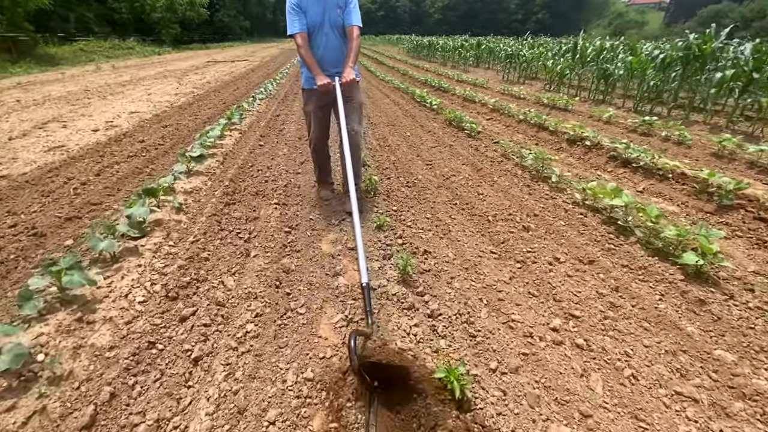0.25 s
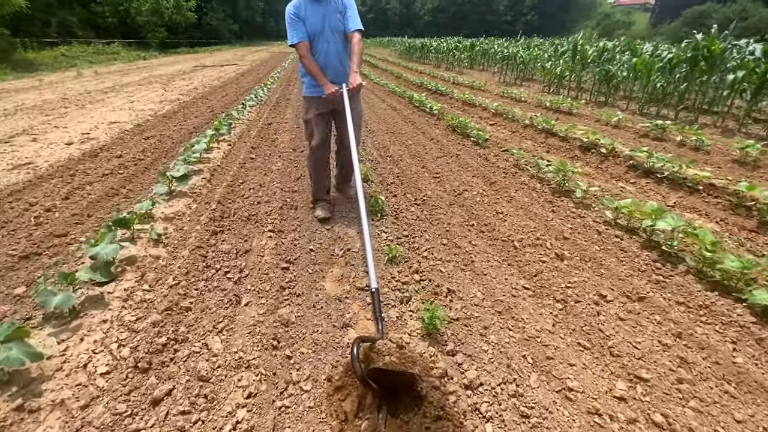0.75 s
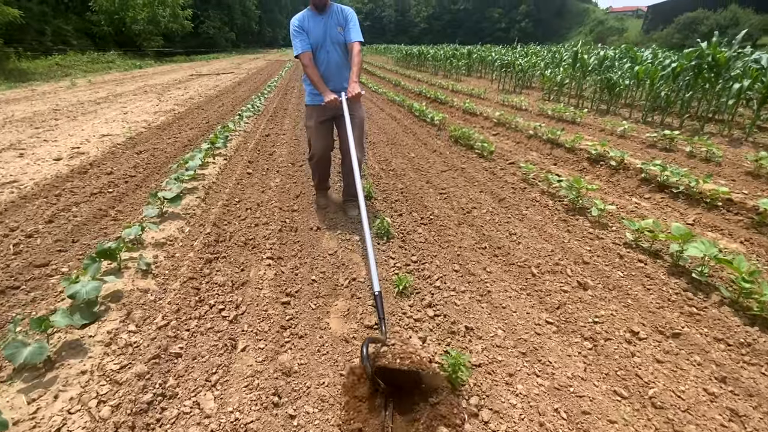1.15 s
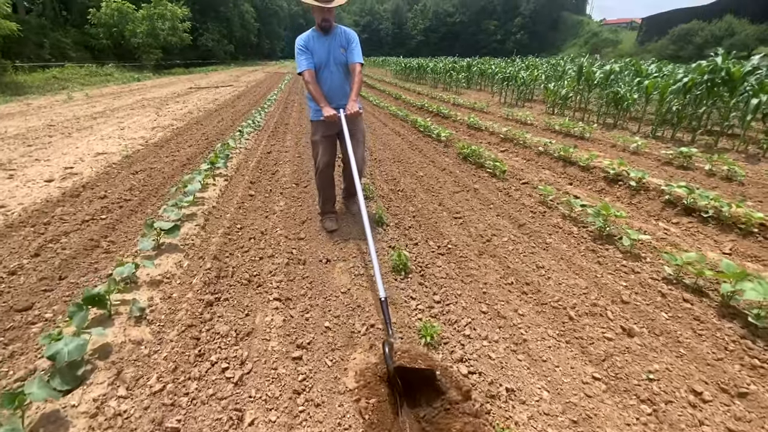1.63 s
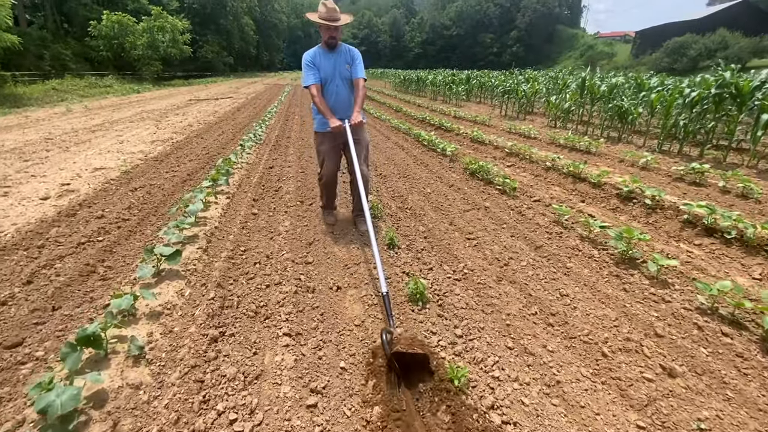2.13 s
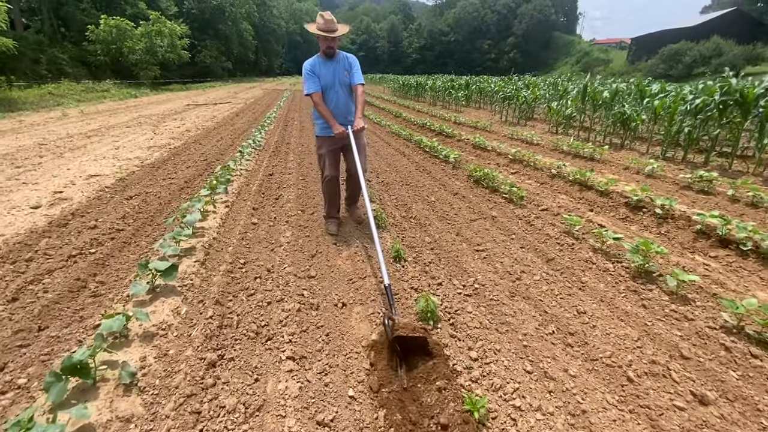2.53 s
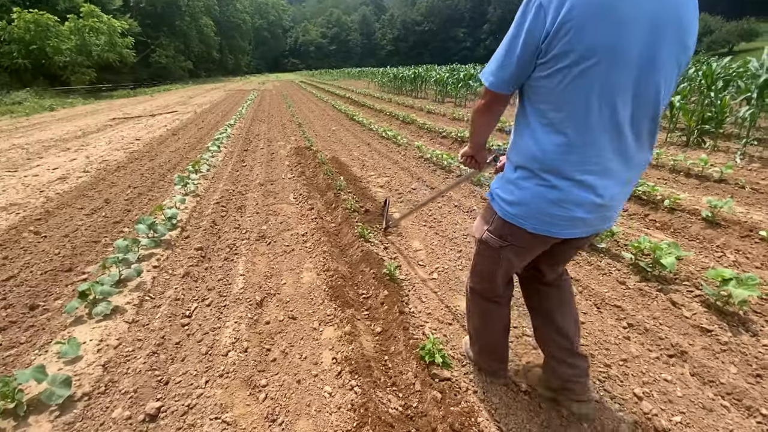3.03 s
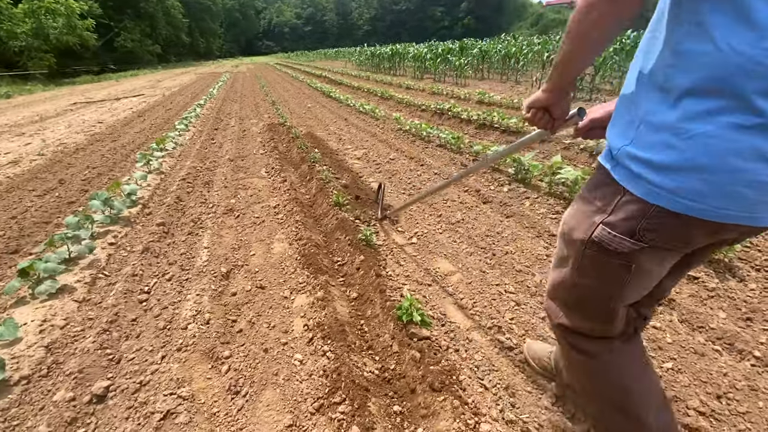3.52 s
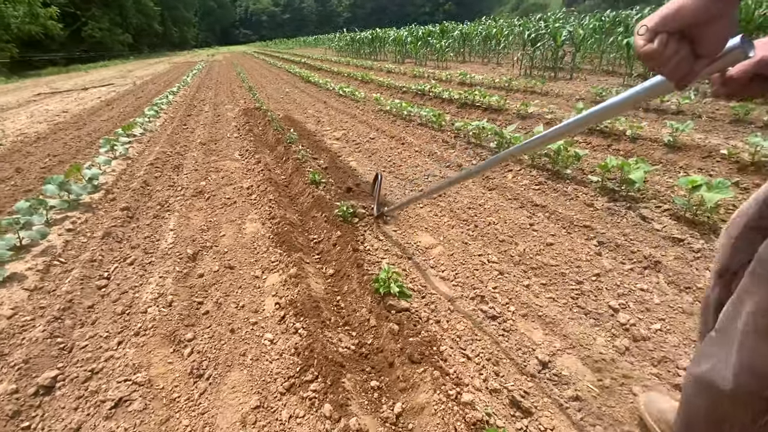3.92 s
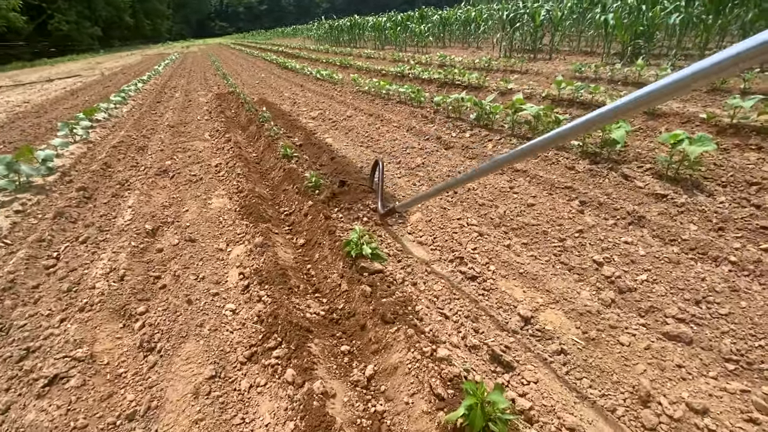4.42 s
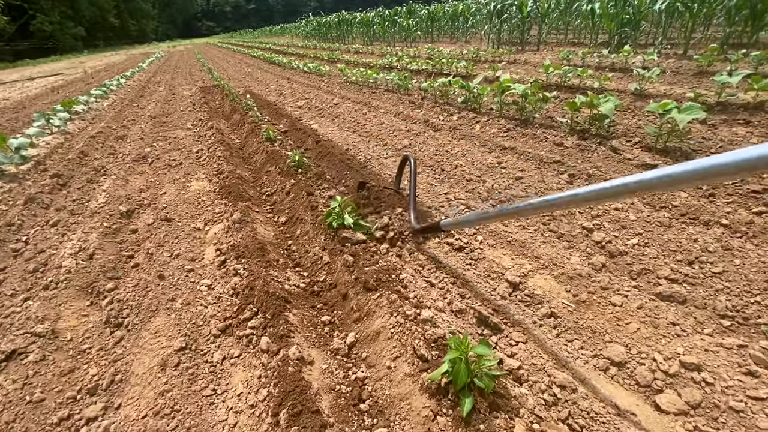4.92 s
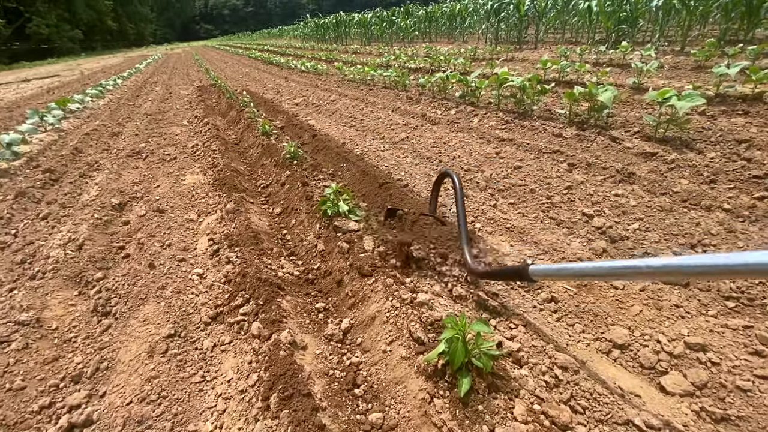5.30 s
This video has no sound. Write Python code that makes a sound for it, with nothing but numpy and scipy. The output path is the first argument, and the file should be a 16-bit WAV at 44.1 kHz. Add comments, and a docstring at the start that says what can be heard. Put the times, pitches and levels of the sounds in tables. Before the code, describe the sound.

A small hand plow scrapes and crunches through dry soil, with stones ticking on steel, dull thuds of clods and boots, and light wind.

```python
"""Hand plow in dry soil

A steel plow is dragged through cloddy soil, heard by a phone from two places one after the other.
Grit hisses and crackles along the blade and rings it; stones strike it, soil rumbles and crunches,
clods and boots thud. Wind buffets the microphone ports, leaves rustle, an insect and a bird call far off."""
import sys
import numpy as np
from scipy import signal
from scipy.fft import rfft, irfft, next_fast_len
from scipy.io import wavfile
from scipy.ndimage import uniform_filter1d, map_coordinates

SR = 44100
rng = np.random.default_rng(int(sys.argv[2]) if len(sys.argv) > 2 else 0)


def master_out(mix):
    """Clip the mix to full scale and print it as 16-bit PCM to the path in sys.argv[1]."""
    frames = np.transpose(np.atleast_2d(mix))
    ceiling = np.clip(frames, -1, 1)
    pcm = np.round(ceiling * 32767).astype(np.int16)
    wavfile.write(sys.argv[1], SR, pcm)


N = 244966
T, FFT_SIZE = np.arange(N) / SR, next_fast_len(N)
FREQ = np.maximum(np.fft.rfftfreq(FFT_SIZE, 1 / SR), 1)
MOVE_S = 2.73  # the phone changes place


def undb(db):
    """Gain of a level in dB."""
    return 10 ** (np.asarray(db) / 20)


def unit(x):
    """Scale to rms 1."""
    return x / np.sqrt(np.mean(x ** 2))


def curves(table):
    """Columns of a time table, one value a sample."""
    times, *columns = np.transpose(table)
    return [np.interp(T, times, column) for column in columns]


def spectra(table):
    """Columns of a frequency table, one value a bin."""
    hz, *columns = np.transpose(table)
    return [np.interp(np.log(FREQ), np.log(hz), column) for column in columns]


def colour(x, table):
    """Shape x by an EQ curve, rms 1."""
    return unit(irfft(rfft(x, FFT_SIZE) * undb(spectra(table)[0]), FFT_SIZE)[..., :N])


def resonate(x, hz, width_hz):
    """Two-pole resonance, gain 1 at the centre."""
    return signal.lfilter(*signal.iirpeak(hz, hz / width_hz, SR), x)


def wander(rate_hz):
    """Slow random modulation: held values, slewed twice."""
    hold = int(SR / rate_hz)
    steps = np.repeat(rng.standard_normal(N // hold + 1), hold)
    return 2.51 * uniform_filter1d(uniform_filter1d(steps, hold), hold)[:N]


def grains(per_s, spread_db):
    """Clicks at random moments, many small and a few large, in two unrelated rows."""
    clicks = (rng.random((2, N)) < per_s / SR) * rng.standard_normal((2, N))
    size_db = spread_db * np.minimum(rng.exponential(size=(2, N)), 2.4)
    return unit(clicks * undb(size_db))


def swells(table, attack_s, t60_s):
    """One envelope an event: attack, hold, release."""
    out = np.zeros((len(table), N))
    for row, (start_s, hold_s, db, *_) in zip(out, table):
        span = slice(int(start_s * SR), int(start_s * SR) + SR // 2)
        age = T[span] - start_s
        release_db = 60 * np.maximum(age - attack_s - hold_s, 0) / t60_s
        row[span] = np.clip(age / attack_s, 0, 1) * undb(db - release_db)
    return out


def impacts(table, rise, ring_db, thud_db):
    """Each hit cracks, rattles and rings at its own pitch and four chance ones, over an optional thud."""
    crack_db, crack_t60_s, sag_s = -2.5, 0.0054, 0.0041
    out, t = np.zeros((2, N + SR)), np.arange(SR // 4) / SR
    noises = rng.standard_normal((len(table), 2, len(t)))
    detunes = rng.uniform(-1.044, 1, (len(table), 4))
    for (start_s, db, hz, decay_s, breadth), noise, detune in zip(table, noises, detunes):
        # a crust that takes long to crumble also takes longer to give way
        age = t / max(decay_s, .01)
        envelope = (1 - np.exp(-age / rise)) * undb(-25 * age - 38 * age ** 2)
        width_hz = np.clip(breadth, .1, 2.5) * hz
        band = resonate(noise, hz, width_hz)
        rattle = unit(resonate(band, hz, width_hz) + 1.4 * band) * envelope
        crack = unit(band) * undb(crack_db - 60 * t / crack_t60_s)
        pitches = np.clip(hz * 2 ** np.append(0, 0.853 * breadth * detune), 60, 11500)
        ring = sum(resonate(rattle, f, .06 * f) * np.sqrt(width_hz / (.06 * f)) for f in pitches)
        # the thud starts an octave high and sags to its pitch
        phase = 2 * np.pi * hz * (t - sag_s * np.expm1(-t / sag_s))
        thud = np.sin(phase) * envelope ** 2 * undb(thud_db)
        start = int(start_s * SR)
        out[:, start:start + len(t)] += (thud + crack + rattle + undb(ring_db) * ring) * undb(db)
    return out[:, :N]


# tone of grit sliding on steel: freq_hz, gain_db
GRIT_EQ = [(410, 7), (700, -3.5), (1750, -7.5), (2500, -10.5), (5460, -8), (6880, -8.5), (7500, -8),
           (11200, -13.5), (13000, -18.5)]


def grit(drag_db, crunch_envelopes):
    """Fine sand hisses and coarser grains crackle in uneven slips; each crunch throws up more."""
    sand = colour(rng.standard_normal((2, N)) + 0.47 * grains(per_s=1000, spread_db=2.5), GRIT_EQ)
    # grain size varies along the furrow, so narrow bands swell on their own
    bands_hz = 800 * 2 ** np.arange(0, 4.1, .33)
    sand = sum(resonate(sand, hz, .3 * hz) * undb(1.7 * wander(30)) for hz in bands_hz)
    thrown = undb(-13.5) * np.linalg.norm(crunch_envelopes, axis=0)
    slips = undb(0.18 * wander(52) + 1.12 * wander(50))
    return unit(sand) * np.hypot(undb(drag_db), thrown) * slips


# modes of the steel blade: pitch_hz, width_hz, gain_db
BLADE_MODES = [(1015, 90, -7), (1213, 35, -7), (1505, 30, -8), (1685, 38, -9), (1925, 50, -4),
               (2130, 45, -5), (2195, 50, -4), (2695, 40, -6), (3040, 110, -4), (3550, 50, -8),
               (3910, 55, -5), (4190, 45, -2), (4460, 45, -7), (4770, 45, -5), (5470, 50, -4),
               (6050, 60, -11), (6500, 100, -11), (7265, 34, -2), (7372, 30, -6), (7447, 22, -5),
               (7510, 45, -7), (8560, 40, -6), (8733, 45, -1), (11100, 90, -8)]
# the ring comes forward as the blade nears: time_s, gain_db
BLADE_NEARNESS = [(0, -9.5), (3.75, -10), (4.2, -3), (5.55, 0)]


def blade(scrape, hits):
    """The steel rings, its top modes faint from afar; the wandering contact drives each mode unevenly."""
    near = undb(curves(BLADE_NEARNESS)[0])
    ring = np.zeros_like(scrape)
    for hz, width_hz, db in BLADE_MODES:
        contact = wander(40)
        drive = scrape * undb(3 * contact - 1.5) + hits * undb(2.5 * contact)
        mode = undb(db) * resonate(drive, hz, width_hz) / np.sqrt(width_hz)
        ring += mode * (near if hz > 7000 else 1)
    drive_rms = np.sqrt(np.mean((scrape + hits) ** 2))
    return near * drive_rms * unit(ring)


# tone of tumbling earth: freq_hz, gain_db
SOIL_EQ = [(59, -38), (100, -1.5), (171, 3), (243, -1.5), (510, -3), (840, -4), (2160, -16.5), (3250, -48)]


def soil():
    """Tumbling soil makes a low, grainy rumble."""
    return colour(rng.standard_normal((2, N)) + 0.59 * grains(per_s=400, spread_db=5), SOIL_EQ)


# the rising breeze: time_s, level_db
BREEZE = [(0.0, -69), (0.6, -61), (1.4, -52.5), (1.85, -45), (2.25, -51.5), (3.0, -48.5), (3.7, -45.5),
          (4.2, -33), (4.6, -38.5), (5.1, -46), (5.55, -40)]
# single puffs: start_s, hold_s, level_db, left_minus_right_db
WIND_PUFFS = [(0.633, 0.037, -46, 1), (0.748, 0.017, -47, 7.5), (1.546, .03, -45, 1),
              (3.223, 0.034, -46, -7), (3.407, 0.02, -43, -5), (3.56, 0.019, -41, 7),
              (3.742, 0.023, -41.5, -9), (3.928, 0.03, -40, -10), (4.42, 0.03, -42, 13),
              (4.723, 0.02, -37, 22.5), (4.955, 0.023, -37, 8), (5.158, 0.05, -35, 2.5)]
# tone of the buffeting: freq_hz, gain_db
WIND_EQ = [(20, -22), (40, -2.5), (60, 4), (120, -6.5), (250, -20.5), (600, -24), (1500, -73)]


def wind():
    """Low buffeting, partly opposed at the two ports; each puff leans to one side."""
    lean = undb(np.outer([1, -1], np.transpose(WIND_PUFFS)[3]))
    puff_power = lean @ swells(WIND_PUFFS, attack_s=0.011, t60_s=0.25) ** 2
    gain = np.sqrt(undb(curves(BREEZE)[0]) ** 2 + puff_power)
    shared, left, right = (colour(rng.standard_normal(N), WIND_EQ) * undb(1.63 * wander(13))
                           for _ in range(3))
    return gain * np.array([left + shared, right - shared]) / np.sqrt(2)


# tone of the open-air bed: freq_hz, gain_db
FIELD_EQ = [(59, -17), (100, 18), (470, 4.5), (1150, -73.5), (1660, -2), (4510, 0.5), (10800, -39),
            (13000, -38)]


def field():
    """Far rustle of leaves and air, partly alike left and right."""
    mid, side = (colour(rng.standard_normal(N), FIELD_EQ) for _ in range(2))
    return undb(-61 + 1.2 * wander(3)) * np.array([mid + .6 * side, mid - .6 * side])


# stones and crusts against the blade: start_s, level_db, pitch_hz, decay_s, breadth_ratio
STONE_HITS = [(0.2505, -40, 5750, 0.037, 1.4), (0.277, -46.5, 5770, 0.054, 1.3),
              (0.3415, -47, 5500, 0.018, 0.56), (0.4, -41.5, 6150, 0.054, 1.1),
              (0.412, -42, 4330, 0.073, 2.35), (0.97, -44.5, 2450, 0.025, 1.8),
              (0.9845, -36.5, 4570, 0.024, 1.8), (1.0975, -49, 5650, 0.024, 1.2),
              (1.2232, -38.5, 1710, 0.16, 4), (1.2507, -34, 4000, 0.11, 1.8),
              (1.4261, -43, 1580, 0.071, 0.59), (1.5165, -44, 5000, 0.023, 1.6),
              (1.562, -52, 4530, 0.13, .1), (1.569, -43, 2550, 0.055, 0.82), (1.6296, -45, 1300, 0.082, 1),
              (1.7391, -45, 4800, 0.042, 1.3), (1.7562, -42, 4900, 0.05, 1),
              (1.925, -46.5, 5240, 0.019, 2.8), (2.0717, -41.5, 2480, 0.086, 4),
              (2.3115, -50, 3830, .02, 0.83), (2.5726, -49.5, 5630, 0.06, 1.5),
              (3.0914, -41, 1700, 0.018, 0.35), (3.1137, -39.5, 1350, 0.05, 3.4),
              (3.2485, -38, 1610, 0.012, 0.6), (3.367, -40, 1380, 0.02, 0.37),
              (3.4201, -43.5, 6400, 0.08, 1.55), (3.686, -40, 6060, 0.061, 0.74),
              (3.8204, -41, 7490, 0.093, 1.15), (3.848, -37, 5930, 0.16, 0.85),
              (4.2385, -42, 1140, 0.027, 1.1), (4.2977, -42, 6600, 0.1, 0.7),
              (4.4036, -42.5, 2260, 0.075, 0.57), (4.4695, -46, 5800, 0.03, 0.21),
              (4.484, -42, 4480, 0.035, 1.3), (4.5254, -42.5, 7800, 0.078, 0.24),
              (4.6818, -39, 4850, 0.074, 2), (4.8248, -35.5, 2450, 0.038, 2.1),
              (4.8493, -28, 4800, 0.054, 1.64), (4.9223, -41, 10100, 0.11, 0.57),
              (4.9932, -38, 7260, 0.099, .5), (5.056, -33, 2830, 0.066, 2.4),
              (5.063, -33.5, 7570, 0.18, 0.21), (5.232, -32.5, 5100, 0.027, 5.6),
              (5.385, -39.5, 4150, 0.076, 0.52), (5.2657, -37, 1800, 0.12, 0.5),
              (5.3195, -33, 7100, 0.07, 0.7), (5.322, -39.5, 4100, 0.19, 0.29),
              (5.412, -39, 2280, 0.09, 0.64), (5.5117, -40, 1060, 0.033, 2)]


def stones(grit_db):
    """Stones strike the steel; small pebbles tick at random, following the level of the grit."""
    count, decay_s, breadth = 30, 0.03, 1
    pebbles = [(when * T[-1], grit_db[int(when * N)] - 2 - 6 * softness,
                1500 * 2 ** (2.62 * pitch), decay_s, breadth)
               for when, pitch, softness in rng.random((count, 3))]
    return impacts(STONE_HITS + pebbles, rise=0.018, ring_db=-16, thud_db=-np.inf)


# soil crushed under boot or blade: start_s, hold_s, level_db, hollow_pitch_hz
SOIL_CRUNCHES = [(0.456, 0.039, -54, 400), (0.641, 0.022, -51, 310), (1.017, 0.012, -57.5, 393),
                 (1.186, 0.061, -48, 463), (1.628, 0.019, -48, 750), (2.059, 0.046, -49, 810),
                 (2.836, 0.062, -42, 626), (2.925, 0.012, -53, 453), (3.066, 0.076, -41, 275),
                 (3.121, 0.0073, -33.5, 420), (3.22, 0.024, -41, 574), (3.525, 0.17, -38, 470),
                 (3.83, 0.13, -43.5, 425), (4.098, 0.034, -33, 426), (4.194, 0.026, -36.5, 517),
                 (4.39, 0.021, -49, 406), (4.644, 0.034, -33.5, 403), (4.832, 0.1, -36.5, 504),
                 (5.057, 0.08, -34, 430), (5.499, .04, -37.5, 404)]


def crunches(rumble, envelopes):
    """Crushed soil: each crunch is a swell of the rumble with a hollow note of its own."""
    hollow_db, width_ratio = -8.5, 0.39
    out = np.zeros_like(rumble)
    for (start_s, *_, hz), envelope in zip(SOIL_CRUNCHES, envelopes):
        span = slice(int(start_s * SR), int(start_s * SR) + SR // 2)
        band = resonate(rumble[:, span], hz, width_ratio * hz)
        hollow = unit(resonate(band, hz, 2 * width_ratio * hz))
        out[:, span] += unit(rumble[:, span] + undb(hollow_db) * hollow) * envelope[span]
    return out * undb(1.7 * wander(70))


# knocks of clods and boots: start_s, level_db, pitch_hz
CLOD_KNOCKS = [(1.219, -39, 633), (1.251, -36, 285), (1.569, -46, 650), (1.632, -41.5, 845),
               (1.801, -37, 133), (1.894, -45, 202), (1.921, -40.5, 210), (2.083, -45, 764),
               (2.317, -49, 193), (2.38, -39.5, 176), (2.602, -47.5, 187), (3.027, -44.5, 476),
               (3.065, -37, 225), (3.13, -27.5, 499), (3.213, -36, 590), (3.247, -37, 545),
               (3.529, -37, 400), (3.596, -30.5, 376), (3.936, -32, 586), (4.007, -28, 399),
               (4.098, -28, 477), (4.124, -26, 222), (4.179, -27.5, 477), (4.295, -34.5, 527),
               (4.494, -36, 496), (4.616, -34, 200), (4.657, -26, 331), (5.078, -27.5, 426),
               (5.371, -24.5, 172), (5.423, -34, 292), (5.449, -36, 490)]


def clods():
    """Clods and boots land with a short, dull thud."""
    decay_s, breadth = 0.056, 0.94
    knocks = [(*knock, decay_s, breadth) for knock in CLOD_KNOCKS]
    return undb(-2.5) * impacts(knocks, rise=0.028, ring_db=-9.5, thud_db=6)


# the buzz fading away: time_s, level_db
INSECT_FADE = [(2.73, -73), (3.5, -79), (3.8, -90)]


def insect():
    """A thin buzz of narrow noise, heard from the second place."""
    buzz = unit(resonate(rng.standard_normal(N), hz=5750, width_hz=120))
    return buzz * undb(curves(INSECT_FADE)[0]) * (T > MOVE_S)


# four chirps, each a list of glide points: time_s, pitch_hz, level_db
BIRD_CHIRPS = [
    [(2.79, 3000, -70), (2.81, 4050, -57), (2.828, 4350, -59)],
    [(2.96, 7200, -66), (2.975, 5400, -69), (2.99, 4700, -59), (3.018, 4150, -61)],
    [(3.085, 4700, -63), (3.115, 4250, -57), (3.122, 3500, -61)],
    [(3.25, 4400, -63), (3.29, 4150, -57), (3.325, 3700, -61)],
]


def bird():
    """A far bird whistles short, pure glides."""
    out, fade_s = np.zeros(N), 0.0029
    for chirp in BIRD_CHIRPS:
        hz, db = curves(chirp)
        start_s, end_s = chirp[0][0], chirp[-1][0]
        gate = np.clip(np.minimum(T - start_s, end_s - T) / fade_s, 0, 1)
        out += np.sqrt(2) * gate * undb(db) * np.sin(2 * np.pi * np.cumsum(hz) / SR)
    return out


# bounces of the blade: start_s, level_db
BOUNCES = [(5.2015, -28.5), (5.2165, -23), (5.2315, -28)]
# modes of the stone it skips on: pitch_hz, gain_db
STONE_MODES = [(990, 8), (1950, 3), (2200, -1), (2980, -4)]


def skips():
    """The blade bounces three times on one stone, which rings briefly, a little differently each time."""
    attack_s, t60_s = 0.0024, 0.027
    out, t = np.zeros(N), np.arange(SR // 8) / SR
    for start_s, db in BOUNCES:
        jitters = rng.standard_normal(len(STONE_MODES))
        ring = sum(undb(mode_db + 2 * jitter - 60 * t / t60_s) * np.sin(2 * np.pi * hz * t + jitter)
                   for (hz, mode_db), jitter in zip(STONE_MODES, jitters))
        out[int(start_s * SR):][:len(t)] += undb(db) * np.minimum(t / attack_s, 1) * ring
    return out


# the steady drag, louder as the blade nears the phone: time_s, grit_db, soil_db
DRAG_LEVELS = [(0.0, -51.5, -67), (0.5, -54.5, -70), (1.15, -55.5, -60), (1.6, -53, -54),
               (2.15, -57.5, -75), (2.45, -58, -57), (2.7, -58.5, -62), (2.76, -51.5, -49.5),
               (3.0, -52, -51.5), (3.5, -49, -46), (3.75, -48.5, -44.5), (4.2, -44.5, -36.5),
               (4.6, -45.5, -45.5), (4.9, -47, -45.5), (5.04, -37.5, -49.5), (5.12, -48, -36),
               (5.19, -42.5, -40), (5.26, -38.5, -40.5), (5.44, -39.5, -38.5), (5.49, -46, -49),
               (5.55, -44, -43)]


def plow():
    """Grit and stones ring the blade as soil tumbles; row one is direct, row two ground scatter."""
    grit_db, soil_db = curves(DRAG_LEVELS)
    crunch_envelopes = swells(SOIL_CRUNCHES, attack_s=0.017, t60_s=0.16)
    scrape = grit(grit_db, crunch_envelopes)
    hits = stones(grit_db)
    rumble = soil()
    furrow = rumble * undb(soil_db + 2.2 * wander(30))
    earth = furrow + crunches(rumble, crunch_envelopes) + clods()
    return scrape + hits + earth + blade(scrape, undb(1.5) * hits) + skips()


# stereo image facing the plow, then beside it: freq_hz, right_lead_rad, likeness_ratio, left_minus_right_db
IMAGE_FACING = [(100, 2.8, .6, 0), (215, 1.6, .8, 1), (350, .7, .9, 2), (1000, 0, .93, 0),
                (2200, -.65, .9, -2), (3000, -.85, .85, 0), (4300, -.9, .75, 11), (6000, -.2, .4, 16),
                (7500, 0, .25, 8), (9300, -2.4, .4, 0)]
IMAGE_BESIDE = [(100, 2.2, .7, 1), (215, .6, .93, 4), (350, .6, .97, -3), (700, .5, .92, -1),
                (1300, .3, .6, 0), (2200, .9, .5, -1), (4300, .1, .35, 4), (7300, .1, .45, 3),
                (8600, .1, .5, -2)]


def ports(sound, image):
    """Each microphone port gets its own phase and level; the right one also takes in the scatter."""
    lead, likeness, pan_db = spectra(image)
    direct, scattered = rfft(sound, FFT_SIZE)
    pan = np.exp(-.5j * lead) * undb(pan_db / 2)
    left = direct * pan
    right = (likeness * direct + np.sqrt(1 - likeness ** 2) * scattered) / pan
    equal_power = np.sqrt(2 / (undb(pan_db) + undb(-pan_db)))
    return irfft(equal_power * np.array([left, right]), FFT_SIZE)[:, :N]


# the plow swings right, so the left port hears it later: time_s, delay_samples
LEFT_DELAY = [(2.73, 6.6), (4.5, 12.8), (5.55, 15.7)]


def scene():
    """The plow from each place in turn, with wind, insect, bird and field around it."""
    tool = plow()
    facing = ports(tool, IMAGE_FACING)
    beside = ports(tool, IMAGE_BESIDE)
    beside[0] = map_coordinates(beside[0], [np.arange(N) - curves(LEFT_DELAY)[0]], order=3)
    crossfade = np.clip((T - MOVE_S) / 0.0067, 0, 1)
    return (1 - crossfade) * facing + crossfade * beside + wind() + insect() + bird() + field()


def record(dry):
    """The image narrows in one high band; the treble falls steeply and the top is cut."""
    narrow_hz, narrow_width_hz, rolloff_hz, top_hz = 10950, 620, 12150, 15800
    mid, side = rfft([dry[0] + dry[1], dry[0] - dry[1]], FFT_SIZE) / 2
    fold = .9 * np.exp(-((FREQ - narrow_hz) / narrow_width_hz) ** 4)
    mid, side = mid * np.sqrt(1 + fold), side * (1 - fold)
    narrowed = irfft([mid + side, mid - side], FFT_SIZE)[:, :N]
    softened = signal.sosfilt(signal.cheby1(12, 1, rolloff_hz, fs=SR, output="sos"), narrowed)
    return signal.sosfilt(signal.ellip(10, .2, 70, top_hz, fs=SR, output="sos"), softened)


dry = scene()
out = record(dry)
master_out(out)
```